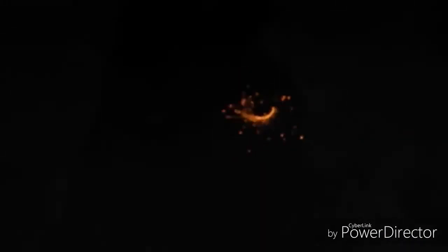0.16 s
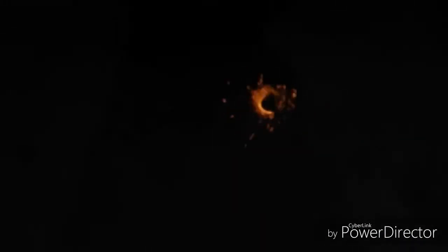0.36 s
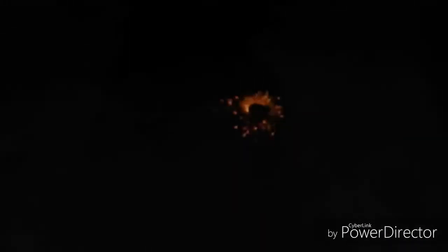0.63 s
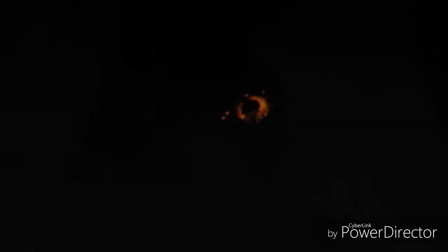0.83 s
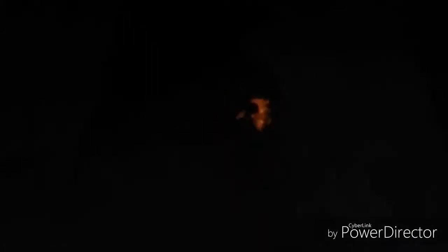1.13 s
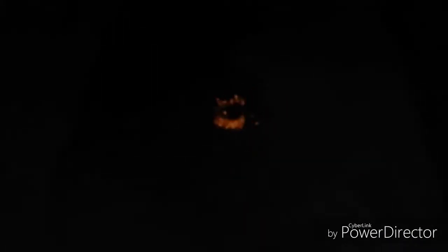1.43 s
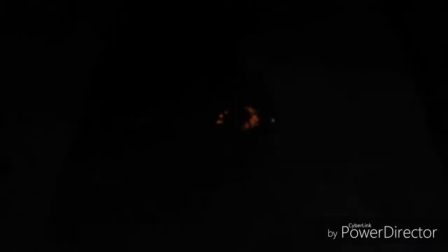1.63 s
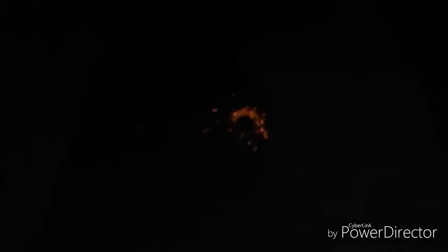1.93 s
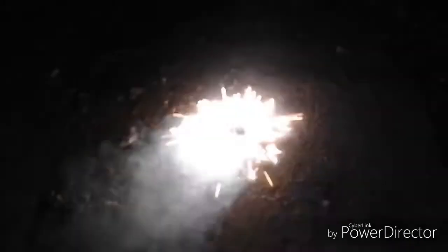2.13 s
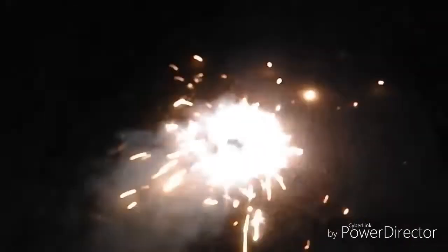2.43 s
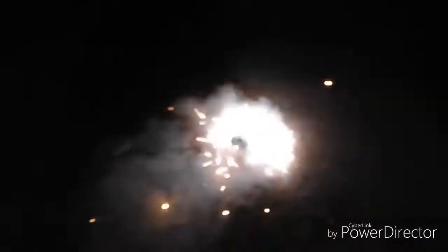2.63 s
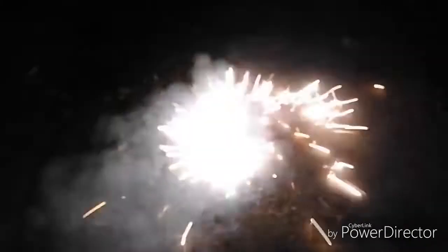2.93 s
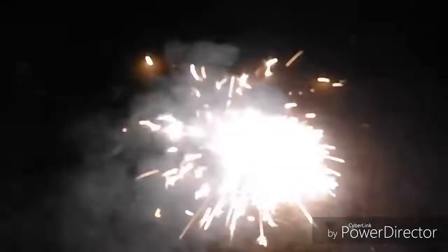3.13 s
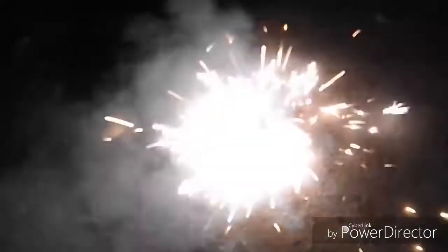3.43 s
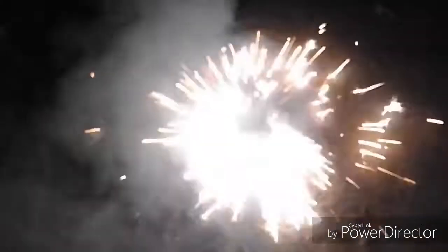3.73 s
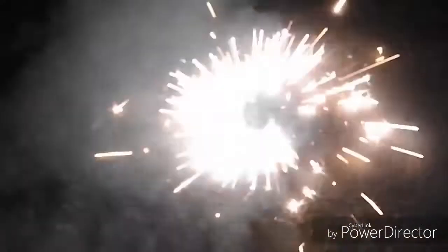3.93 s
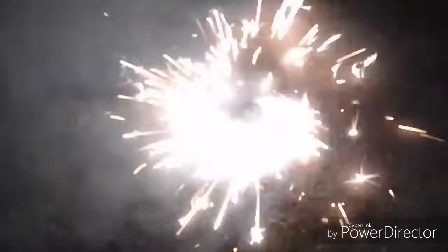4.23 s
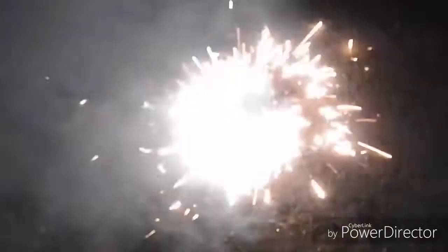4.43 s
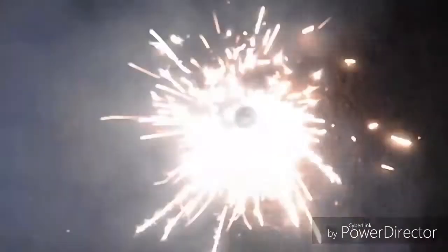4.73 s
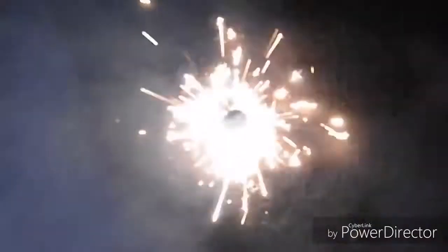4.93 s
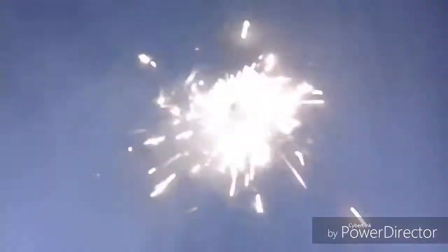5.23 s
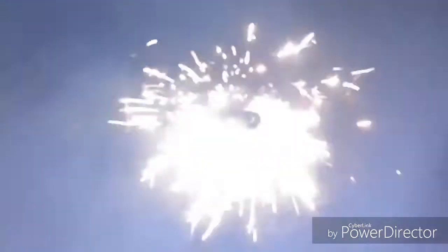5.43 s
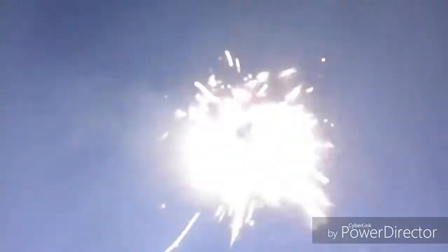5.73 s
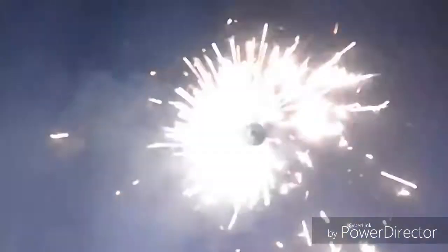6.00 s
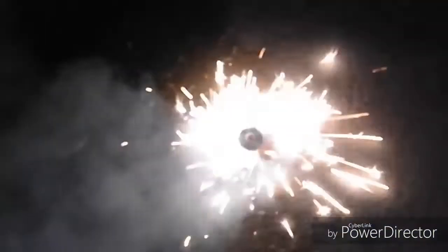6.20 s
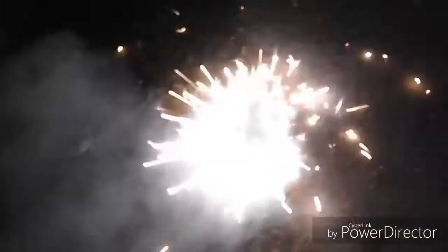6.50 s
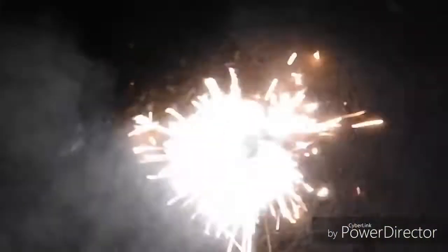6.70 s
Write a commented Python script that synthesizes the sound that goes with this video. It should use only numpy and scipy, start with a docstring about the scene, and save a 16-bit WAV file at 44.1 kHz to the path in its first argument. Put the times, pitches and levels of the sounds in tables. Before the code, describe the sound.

A weak, wavering fizz with a few tiny crackles outdoors, then a spinning firework flares into a loud, steady, fluttering hiss of sparks.

```python
"""A weak, unsteady fizz comes first; after some two seconds the main charge flares into a loud hiss.
A small firework wheel spins on hard ground outdoors: its jet is coloured turbulence with crackling grains,
a path round the casing sweeps a notch once a turn, and a few sparks pop, in one or more fading rings.
An inverted echo off the ground cuts a comb of notches; late on a second echo slides its own comb up and down."""
import sys
import numpy as np
from scipy import signal
from scipy.fft import rfft, irfft
from scipy.io import wavfile
from scipy.ndimage import map_coordinates

SR = 44100
rng = np.random.default_rng(int(sys.argv[2]) if len(sys.argv) > 2 else 0)


def rack_gain(trim_db):
    """Turn a fader trim in dB into the linear factor to multiply a signal by."""
    fader = np.asarray(trim_db, float)
    return 10 ** (fader / 20)


def master(y):
    """Save y as 16-bit WAV."""
    cut = np.clip(np.atleast_2d(y).T, -1, 1)
    pcm = np.round(cut * 32767)  # scale
    wavfile.write(sys.argv[1], SR, pcm.astype(np.int16))


N = 302393  # samples

# ground echo: t/s, lag/ms, strength (0-1) before the near surface blocks part of it
GROUND_ECHO = [(0, .31, .64), (1.5, .29, 0.64), (1.9, .31, 0.66), (3.5, .33, 0.61), (5.7, .32, 0.88)]
# how squarely the near surface faces the microphone: t/s, strength (0-1)
SURFACE_FACING = [(5.7, 0), (5.76, .75), (6.0, .7), (6.1, 1)]
# rings of the popping sparks, a pop may have several, the last a low thump:
# t/s, ring level/dB, ring f/Hz, t60/ms
POP_RINGS = [(.4160, -41, 1500, 5), (.4188, -37, 1500, 5), (.76925, -36, 5200, 1.8),
             (.7694, -31, 2200, 3.5), (.8020, -30, 1100, 4.5), (.8040, -43, 350, 12),
             (.8197, -36, 5500, 1.6), (3.1045, -31, 4000, 1.5), (3.5842, -29, 2500, 1.8),
             (6.02714, -14, 4400, 1.5), (6.02718, -20, 2200, 3.5), (6.0300, -60, 48, 110)]
# spin of the wheel: t/s, rate/(turns per s)
WHEEL_SPIN = [(0.0, 12.38), (0.75, 15.09), (1.1, 13.07), (2.6, 9.27), (3.2, 12.4), (3.5, 12.62),
              (4.0, 14.22), (5.3, 14.48), (5.65, 12.74), (6.45, 14.77), (6.86, 14.72)]
# strength of the burn: t/s, roar level/dB, brightness/dB
BURN_STRENGTH = [(0, -55.5, 1), (.1, -52.5, -4), (.24, -57.5, -2), (.62, -55.5, 2), (.82, -54, -1),
                 (.88, -66.5, 0.5), (1.0, -64.5, 0.5), (1.4, -61.5, 2.5), (1.7, -69, 4), (1.92, -63, 3.5),
                 (2.13, -63, 2.5), (2.26, -44.5, 2.5), (2.46, -36, -4), (2.6, -43.5, 3.5), (3.1, -41, -2),
                 (3.5, -39.5, -1), (4.1, -39, 2), (4.6, -39, 1), (5.2, -42, 2.5), (5.44, -39.5, 1),
                 (6.05, -39.5, 0.5), (6.5, -40, -3), (6.86, -41, -2.5)]
# spurts of the jet, negative where it falters: t/s, swell level/dB, length/ms
JET_SPURTS = [(.31, 2.5, 67), (.51, -1.5, 67), (.42, 2.5, 50), (.58, -1.5, 30), (.98, -3, 50),
              (1.05, 4, 55), (1.21, -5, 75), (1.24, 4, 20), (1.62, -2, 47), (1.67, 3.5, 53), (1.865, 4, 20),
              (1.955, 4.5, 22), (2.14, 3.5, 43), (2.33, 0, 57), (2.63, 0.5, 27), (4.25, -2.5, 91),
              (4.6, 2.5, 73), (5.11, 2.5, 38), (5.32, -2, 100), (6.04, 2.5, 30), (6.108, 3.5, 64),
              (6.21, 2.5, 12), (6.39, 2.5, 40), (6.521, 2, 110)]
# colour of the jet noise: f/Hz, relative level/dB
JET_COLOUR = [(25, -24), (60, -25), (120, -9.5), (250, -9), (430, -2), (640, -3.5), (1000, -3),
              (1400, -3.5), (2100, -1), (3000, 2.5), (4000, 0.5), (7000, -5), (10000, -6), (14200, 2),
              (15500, -2.5)]


def rms_one(x):
    """Scales a signal to an RMS of 1."""
    return x / np.sqrt(np.mean(x ** 2) + 1e-20)


def in_time(rows):
    """Draws each column of a table as a curve, one value per sample."""
    s, *columns = np.transpose(rows)
    return [np.interp(np.arange(N) / SR, s, c) for c in columns]


def drift(corner_hz):
    """Slow chance of spread 1: noise through a double one-pole low-pass, drawn every 20 samples."""
    r = np.exp(-40 * np.pi * corner_hz / SR)
    slow = signal.lfilter([1], [1, -2 * r, r * r], rng.standard_normal(N // 20 + 3002))
    slow = slow[3000:]  # skip the filter's settling
    return np.interp(np.arange(N) / 20, np.arange(len(slow)), rms_one(slow))


def delayed(x, lag_ms):
    """Reads x a varying time late."""
    return map_coordinates(x, [np.arange(N) - lag_ms * SR / 1000], order=3)


def bin_hz():
    """Frequency of each spectrum bin, nudged up 1 Hz to stay clear of zero."""
    return np.arange(N // 2 + 1) * SR / N + 1


def pass_band(low_hz, high_hz, order):
    """Smooth weights 0-1 over the spectrum's bins."""
    hz = bin_hz()
    return 1 / (1 + (low_hz / hz) ** order) / (1 + (hz / high_hz) ** order)


def band(x, low_hz, high_hz, order):
    """Keeps one band of x, without phase shift."""
    return irfft(rfft(x) * pass_band(low_hz, high_hz, order), N)


def rumble():
    """Low rumble: leaky-summed noise, partly shared by the channels and partly each channel's own."""
    noise = rng.standard_normal(N) + .6 * rng.standard_normal((2, N))
    return rack_gain(-87) * rms_one(signal.lfilter([1], [1, -.99], noise))


def microphone(x):
    """One microphone, deaf to deep bass, adds its faint self-noise."""
    heard = signal.lfilter(*signal.butter(2, 74, "high", fs=SR), x)
    return heard + rack_gain(-92) * rng.standard_normal(N)


def echo(x, lag_ms, strength, shift_turns, low_hz, high_hz):
    """Grazing reflection: late, inverted, phase-shifted and weaker at both ends of the spectrum."""
    shifted = rfft(x) * pass_band(low_hz, high_hz, order=4) * np.exp(2j * np.pi * shift_turns)
    return -strength * delayed(irfft(shifted, N), lag_ms)


def scatter(x):
    """Things lying about scatter the sound: a faint, fast-fading burst of random reflections."""
    level_db, t60_s = -15.5, .05
    age = np.arange(SR // 10) / SR
    tail = rng.standard_normal(len(age)) * rack_gain(-60 * age / t60_s) * (age > .0015)
    tail = rack_gain(level_db) * tail / np.linalg.norm(tail)
    return signal.fftconvolve(x, tail)[:N]


def near_lag():
    """The near echo's lag shrinks while the surface comes, and grows again while it leaves."""
    rest_ms, dip_ms, creep_ms_per_s = .443, .137, .055
    closest_s, coming_s, leaving_s = 5.97, .3, .47
    since = np.arange(N) / SR - closest_s
    swing = np.clip(since / np.where(since < 0, coming_s, leaving_s), -1, 1)
    creep = creep_ms_per_s * np.maximum(since - leaving_s, 0)  # afterwards it creeps closer again
    return rest_ms - creep - dip_ms * np.cos(np.pi / 2 * swing) ** 2


def near_surface_colour(x, nearness):
    """The near surface lifts the mid treble and screens the highest."""
    top = band(x, 12000, SR, order=4)
    cupped = band(x, 5360, 9700, order=6)
    return x + nearness * (1.47 * cupped - .75 * top)


def ground(x):
    """Direct sound, ground and near-surface echoes and scatter add up; the lags comb the spectrum."""
    nearness, = in_time(SURFACE_FACING)
    x = near_surface_colour(x, nearness)
    lag_ms, strength = in_time(GROUND_ECHO)
    block_s, block_over_s = 5.72, .082
    blocked = np.clip((np.arange(N) / SR - block_s) / block_over_s, 0, 1)
    strength = strength * (1 - .88 * blocked)  # the near surface gets in the way
    off_ground = echo(x, lag_ms, strength, shift_turns=-.09, low_hz=1050, high_hz=11000)
    off_surface = echo(x, near_lag(), .6 * nearness, shift_turns=.1, low_hz=1800, high_hz=14500)
    return x + off_ground + off_surface + scatter(x)


def pops():
    """Each row is one ring of a pop, peaking in a dip of pressure; it rises faster than it dies."""
    t, out = np.arange(N) / SR, np.zeros(N)
    for s, db, hz, t60_ms in POP_RINGS:
        near = slice(round(s * SR) - 2000, round(s * SR) + 6000)
        age = t[near] - s
        fade_db = -60000 * np.where(age > 0, age, -2.2 * age) / t60_ms
        ring = rack_gain(fade_db) * np.cos(2 * np.pi * hz * age)
        crack = rack_gain(-5) * np.exp(-(age * 24000) ** 2) * (hz > 1800)  # bright rings add a sharp crack
        out[near] -= rack_gain(db) * (ring + crack)
    return out


def spinning(x):
    """A second path round the casing grows as the nozzle turns away: one notch sweeps once a turn."""
    start_turn, longest_lag_ms, casing_share = .55, .106, .52
    turns = start_turn + np.cumsum(in_time(WHEEL_SPIN)[0]) / SR
    away = np.abs(np.sin(np.pi * (turns % 1) ** .75))  # the path lengthens faster than it shortens
    round_casing = band(x, 4200, 10000, order=6)
    return x + casing_share * delayed(round_casing, longest_lag_ms * away)


def turbulence(flutter_db, crackles_per_s, crackle_db, spread_db):
    """Fluttering noise with burning grains on top, whose shocks all pull the same way."""
    noise = rng.standard_normal(N) * rack_gain(flutter_db * drift(82))
    sizes = rack_gain(crackle_db + spread_db * np.minimum(rng.exponential(1, N), 4))
    return noise - sizes * (rng.random(N) < crackles_per_s / SR)


def jet_bands(roar_db):
    """The turbulence is coloured and split in roar, hiss and sizzle, bounded near 2.8 and 9.3 kHz."""
    hz = bin_hz()
    colour_hz, colour_db = np.transpose(JET_COLOUR)
    colour = rack_gain(np.interp(np.log(hz), np.log(colour_hz), colour_db))
    noise = turbulence(flutter_db=-.5, crackles_per_s=400, crackle_db=9, spread_db=2.5)
    spectrum = rfft(noise) * colour
    below_hiss = 1 / (1 + (hz / 2800) ** 6)
    below_sizzle = 1 / (1 + (hz / 9300) ** 12)
    roar = rms_one(irfft(spectrum * below_hiss, N))
    hiss = rms_one(irfft(spectrum * (below_sizzle - below_hiss), N))
    sizzle = rms_one(irfft(spectrum * (1 - below_sizzle) * (hz < 15500), N))
    thin = rms_one(irfft(spectrum * pass_band(15000, 15500, order=12), N))
    weakness = np.clip((-48 - roar_db) / 32, 0, 1)
    return roar, hiss, sizzle + weakness * thin  # a weak burn spits thinner and higher


def jet():
    """The gas jet: roar, hiss and sizzle follow the burn, each with its own level and unrest."""
    roar_db, bright_db = in_time(BURN_STRENGTH)
    roar, hiss, sizzle = jet_bands(roar_db)
    gust_db = .6 * drift(3.1)
    t = np.arange(N) / SR
    spurt_db = sum(db * np.exp(-((t - s) / (ms / 2000)) ** 2) for s, db, ms in JET_SPURTS)
    # levels beside the roar
    hiss_db = -3 + .98 * bright_db
    sizzle_db = -15 + .56 * bright_db
    sizzle_db = sizzle_db + .17 * (roar_db + 40)  # a stronger burn sizzles more
    sizzle_db = sizzle_db + 7 * in_time(SURFACE_FACING)[0] ** 2  # thrown at the microphone
    roar = rack_gain(-1.5 + .77 * spurt_db + .93 * drift(45)) * roar
    hiss = rack_gain(hiss_db + spurt_db + 1.1 * drift(27)) * hiss
    sizzle = rack_gain(sizzle_db + spurt_db + 1.9 * drift(30)) * sizzle
    return rack_gain(roar_db + gust_db) * (roar + hiss + sizzle)


def scene():
    """The wheel and its sparks over hard ground, one microphone feeding both channels, over low rumble."""
    bursts = pops()
    # sparks in the air meet the echoes less
    heard = ground(spinning(jet()) + .45 * bursts) + .55 * bursts
    return microphone(heard) + rumble()


def top_cut(x):
    """Nothing passes above the cut-off."""
    return signal.sosfilt(signal.butter(12, 16030, fs=SR, output="sos"), x)


def record(dry):
    """The microphone housing cuts a narrow dip; the converter adds a small steady offset."""
    dip_hz, dip_width_hz, dip_depth = 2720, 380, .45
    dip = signal.lfilter(*signal.iirpeak(dip_hz, dip_hz / dip_width_hz, fs=SR), dry)
    mix = dry - dip_depth * dip - .0004
    return top_cut(mix)


dry = scene()
out = record(dry)
master(out)
```